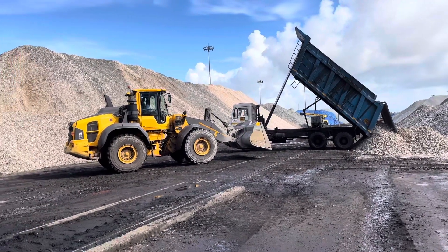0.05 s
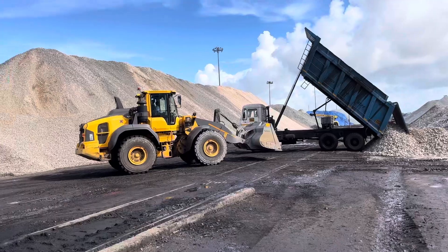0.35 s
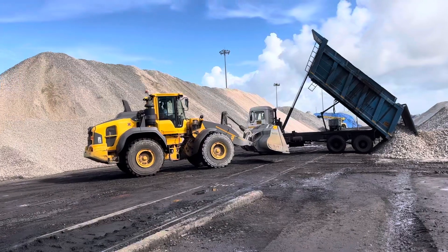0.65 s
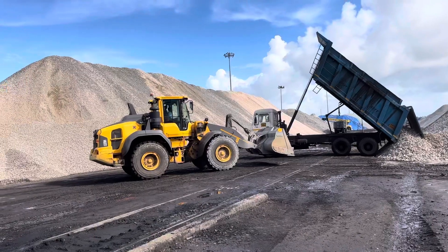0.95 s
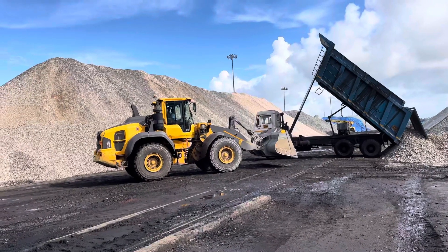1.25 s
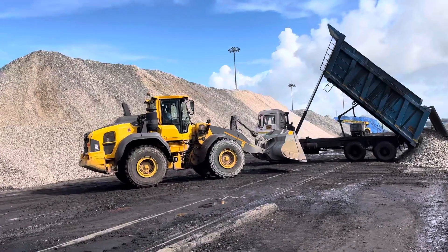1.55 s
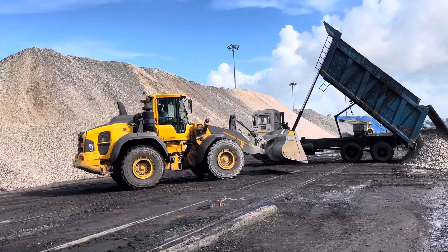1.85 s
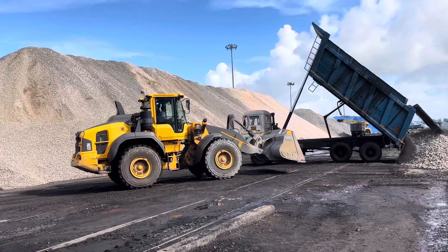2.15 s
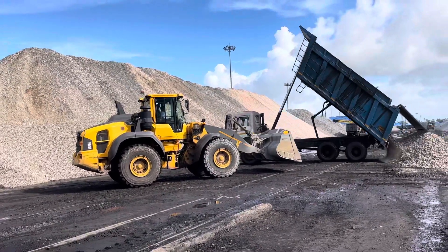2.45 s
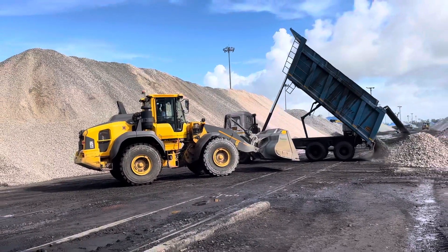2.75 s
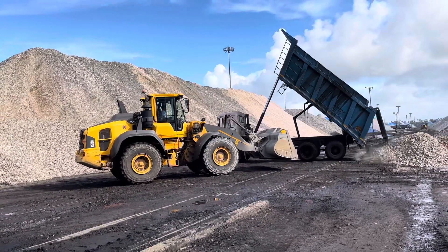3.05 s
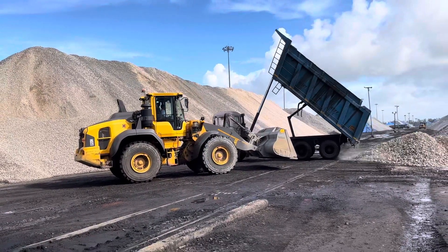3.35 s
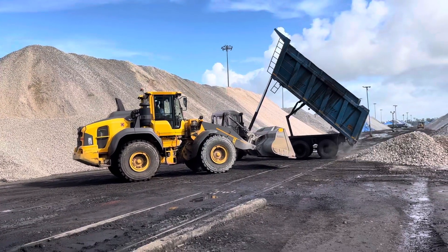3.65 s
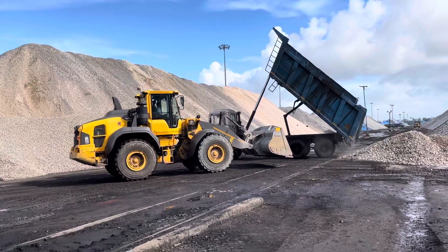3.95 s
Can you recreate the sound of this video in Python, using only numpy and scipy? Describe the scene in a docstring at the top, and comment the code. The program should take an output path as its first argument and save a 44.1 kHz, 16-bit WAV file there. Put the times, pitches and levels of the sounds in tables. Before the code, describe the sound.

Stones hiss down a tipping truck bed onto a heap outdoors, drumming and ringing on the steel while diesel engines rumble. A short hinge squeal leads to a loud tailgate bang and a hollow shudder.

```python
"""Tipper truck dumping gravel.

Diesel engines rumble in an open yard; one whines up as it gathers speed. The last stones hiss down
the raised steel bed onto the heap; the bed drums, hums and rings more brightly as it empties.
The tailgate squeals on its hinges and slams, and the hollow bed booms and shudders on."""
import sys
import numpy as np
from scipy import signal
from scipy.fft import rfft, irfft
from scipy.io import wavfile
from scipy.ndimage import uniform_filter1d

SR = 44100
rng = np.random.default_rng(int(sys.argv[2]) if len(sys.argv) > 2 else 0)


def unload_wav(signal):
    """Save mono or channel-first audio to the path in sys.argv[1] as 16-bit WAV at rate SR, clipped to [-1, 1]."""
    wavfile.write(
        sys.argv[1],
        SR,
        np.round(np.clip(np.atleast_2d(signal).T, -1, 1) * 32767).astype(np.int16),
    )


N = 176400
T = np.arange(N) / SR
HZ = np.maximum(np.arange(N // 2 + 1) * SR / N, 1)

ENGINE_LEVEL = [(0, -36.5), (1.2, -36), (1.7, -34), (2.6, -28.5), (2.9, -33.5), (4, -27.5)]  # exhaust rumble: time_s, level_db
ENGINE_SPECTRUM = [(22, -41), (52, -2.5), (95, -4), (140, -6.5), (200, -8.5), (350, -14), (480, -26),
                   (4000, -74)]  # freq_hz, gain_db
CASING_MODES = [(695, -5.5, 0.031), (815, -2.5, 0.033), (922, 0.5, 0.092), (1078, 0.5, 0.021),
                (1770, -5, 0.027)]  # engine casings: freq_hz, gain_db, t60_s
WHINE_GLIDE = [(.82, 668, -60), (.87, 676, -41), (1.02, 706, -40.5), (1.13, 738, -39), (1.42, 748, -36.5),
               (1.6, 768, -39), (1.85, 790, -52)]  # engine speeding up: time_s, pitch_hz, level_db

HUM_SWELLS = [(0.29, 0.16, -31.5), (0.436, 0.066, -29.5), (0.532, 0.093, -29), (.825, 0.093, -31.5),
              (.99, 0.27, -27.5), (1.218, .05, -27.5), (1.366, 0.14, -25.5), (1.68, 0.47, -28)]  # bed under the slipping load: centre_s, length_s, level_db
LUMP_KNOCKS = [(0.798, -21.5), (1.748, -18.5), (1.963, -20), (3.129, -17), (3.3, -23.5)]  # lumps on the bed: start_s, level_db
LUMP_MODES = [(94.6, -10.5, 0.23), (162.4, -5.5, 0.1), (256, 3, 0.095), (318, -3, 0.073)]  # knocked bed: freq_hz, gain_db, t60_s
STONE_PINGS = [(0.199, -19.5, 1280, 0.025), (.252, -20, 1240, 0.035), (0.425, -21, 1720, 0.035),
               (.709, -19, 4300, 0.013)]  # bouncing stones: start_s, level_db, pitch_hz, t60_s
SQUEAK_GLIDE = [(1.08, 4140, -80), (1.12, 4170, -42), (1.16, 4220, -33), (1.19, 4200, -80)]  # stone along steel: time_s, base_hz, level_db

SLIDE_LEVEL = [(0, -41.5), (.1, -37), (.75, -36), (1.15, -32.5), (1.55, -28.5), (1.95, -24.5),
               (2.35, -22.5), (2.85, -25), (2.95, -21.5), (2.98, -19), (3.05, -23), (3.2, -27.5),
               (3.38, -31.5), (3.6, -56), (3.75, -54)]  # gravel over steel: time_s, level_db
SLIDE_SPECTRUM = [(500, -18.5), (900, -1.5), (1500, 4), (1780, 5.5), (2030, -1), (2300, 3.5), (2750, 3),
                  (3300, 0.5), (4100, 0), (5000, -7.5), (5500, -13), (6500, -9.5), (7500, -16)]  # freq_hz, gain_db
SLIDE_TREBLE = [(10500, -18.5), (14000, -24)]  # freq_hz, gain_db
SPILL_SWELLS = [(.08, 0.058, -39), (.38, 0.046, -37.5), (.87, .07, -36.5), (1.96, 0.16, -32),
                (2.32, 0.092, -27.5)]  # fine stones skittering: centre_s, length_s, level_db
SPILL_SPECTRUM = [(900, -17), (2200, 6.5), (6500, -1.5), (13000, -17)]  # freq_hz, gain_db
FLOOR_LEVEL = [(0, -45), (1.5, -51.5), (2.1, -26), (2.6, -21.5), (2.9, -22), (2.99, -16.5), (3.06, -26),
               (3.2, -25.5), (3.35, -58)]  # bared floor ringing: time_s, level_db
STEEL_MODES = [(1257, -4, 0.082), (1594, -3.5, 0.083), (1707, -3, 0.06), (1795, -.5, 0.085),
               (2232, -7.5, 0.11), (2420, -7.5, 0.068), (2570, -9, 0.11), (3170, 0.5, 0.032),
               (3293, 0, 0.055), (3437, 3, 0.038), (6320, -20, 0.025)]  # freq_hz, gain_db, t60_s
HEAP_LEVEL = [(0, -42.5), (.7, -38.5), (1.0, -32.5), (1.35, -29), (1.9, -26), (2.5, -27), (2.9, -31),
              (3.4, -31), (4, -35)]  # gravel landing: time_s, level_db
HEAP_SPECTRUM = [(100, -24), (200, 4.5), (390, 6.5), (520, 0), (850, .5), (1200, -1), (3500, -61)]  # freq_hz, gain_db
PANEL_LEVEL = [(0, -46), (1.2, -36), (1.45, -28), (1.78, -24.5), (2.13, -29), (2.35, -22), (2.66, -39),
               (3.15, -36), (3.3, -37.5)]  # load drumming on the bed: time_s, level_db
PANEL_MODES = [(205.7, -4, 0.32), (246.2, -2, 0.18), (271.8, -4, 0.17), (320, -7, 0.12)]  # freq_hz, gain_db, t60_s

HINGE_GLIDE = [(2.9, 965, -70), (3.0, 940, -41), (3.07, 918, -35), (3.17, 905, -37), (3.3, 880, -48),
               (3.4, 880, -70)]  # hinge squeal: time_s, base_hz, level_db
HINGE_PARTIALS = [(0.999, 3.5), (2.55, 5)]  # ratio, gain_db
GATE_HITS = [(3.4316, -5, -14.5), (3.459, -22, -18.5), (3.499, -40, -17.5), (3.521, -52, -17)]  # slam, then three weaker rebounds: start_s, crack_db, boom_db
CRACK_SPECTRUM = [(300, -3), (1500, -10), (3600, 13.5), (5700, -8), (7100, 3), (14000, -12)]  # steel on steel: freq_hz, gain_db
BED_MODES = [(63.9, -10.5, 4.5), (86.3, -6, 1.1), (119.6, -6, 0.86), (163, -2.5, 1), (256, -17, 0.36),
             (309.6, -3, 0.29), (388, -6, 0.25)]  # hollow bed: freq_hz, gain_db, t60_s
THUD_MODES = [(84, -19, 0.26), (320, 2, 0.028)]  # first shove on the bed: freq_hz, level_db, t60_s
RATTLE_BANDS = [(35.7, 134, -21, 0.015, 1.24), (135, 380, -17, 0.023, 2.25), (427, 1430, -22, 0.043, 1.24),
                (1340, 3900, -19, 0.033, 0.44), (2460, 4600, -29, 0.0036, 1.35),
                (4900, 9000, -30, 0.0084, 0.57)]  # gate rattle: low_hz, high_hz, level_db, attack_s, t60_s
GRIT_BANDS = [(9000, 14000, -39, .012, .46)]  # grit off the gate: low_hz, high_hz, level_db, attack_s, t60_s
GATE_RING_MODES = [(921, -5, 0.3), (1195, 0, 0.3), (1295, -6, 0.25), (2360, -14, 0.06)]  # ringing gate: freq_hz, gain_db, t60_s
SHUDDER_LEVEL = [(3.5, -37), (3.75, -33), (3.87, -22), (3.94, -21.5), (4, -13.5)]  # bed shuddering: time_s, level_db
BED_SHUDDER_MODES = [(82.6, 1.5, 1.1), (106.2, -1, 0.36), (162.4, 0, 0.91), (253.4, -10.5, 0.24),
                     (339.4, -6.5, 0.16)]  # freq_hz, gain_db, t60_s

STEREO_PHASE = [(90, 0), (250, .25), (600, 1.4), (800, -.4), (1400, 2.0), (2250, 1.3), (2800, 3.0),
                (3250, 1.7), (3650, 2.4), (4800, 0), (7000, 1.4), (11000, .3)]  # freq_hz, right_lead_rad
STEREO_COHERENCE = [(200, .88), (700, .55), (1400, .8), (3300, .78), (5300, .3), (12000, .8)]  # freq_hz, coherence
STEREO_BALANCE = [(60, 1), (250, -2), (520, 0.5), (770, -6.5), (1350, 1.5), (1700, -2.5), (2500, -4.5),
                  (3050, -6.5), (3450, -3.5), (4400, -1.5), (6000, -0.5)]  # freq_hz, left_minus_right_db


def from_db(db):
    """Decibels to gain."""
    return 10 ** (np.asarray(db) / 20)


def rms_one(x):
    """Scale to unit rms."""
    return x / np.sqrt(np.mean(x ** 2) + 1e-20)


def level(rows):
    """Gain envelope from time_s, level_db rows."""
    return from_db(np.interp(T, *np.transpose(rows)))


def swells(rows):
    """Gain envelope, one cosine arch per row."""
    return sum(from_db(db) * np.cos(np.pi * np.clip((T - centre_s) / length_s, -.5, .5))
               for centre_s, length_s, db in rows)


def burst(start_s, attack_s, t60_s):
    """Linear rise, exponential fall."""
    rise = np.clip((T - start_s) / attack_s, 0, 1)
    return rise * from_db(-60 * np.maximum(T - start_s - attack_s, 0) / t60_s)


def at_hz(rows):
    """Interpolate a table over log frequency."""
    hz, value = np.transpose(rows)
    return np.interp(np.log(HZ), np.log(hz), value)


def coloured(x, spectrum):
    """Filter by a spectrum; unit rms."""
    return rms_one(irfft(rfft(x) * from_db(at_hz(spectrum)), N))


def drift(corner_hz):
    """Low-passed noise; unit rms."""
    return rms_one(irfft(rfft(rng.standard_normal(N)) / (1 + (HZ / corner_hz) ** 2), N))


def sine(hz, waver):
    """Unit-rms sine; waver is the relative pitch spread."""
    return np.sqrt(2) * np.sin(2 * np.pi * np.cumsum(hz * (1 + waver * drift(41.7))) / SR)


def tone(glide, partials, waver, flutter_db):
    """Gliding tone; each ratio, gain_db partial flutters independently."""
    time_s, hz, db = np.transpose(glide)
    base_hz = np.interp(T, time_s, hz)
    wave = sum(from_db(gain_db + flutter_db * drift(44)) * sine(ratio * base_hz, waver)
               for ratio, gain_db in partials)
    return from_db(np.interp(T, time_s, db)) * wave


def ring(x, hz, t60_s):
    """One mode: a unit click starts a decaying unit sine."""
    radius, angle = from_db(-60 / (t60_s * SR)), 2 * np.pi * hz / SR
    return signal.lfilter([0, np.sin(angle)], [1, -2 * radius * np.cos(angle), radius ** 2], x + 1e-18)


def clicks(times_s, db):
    """One impulse at each time."""
    out = np.zeros(N)
    np.add.at(out, np.clip((np.asarray(times_s) * SR).astype(int), 0, N - 1), from_db(db))
    return out


def contacts(per_s, spread_db):
    """Two independent showers of random impacts: direct, scattered."""
    sizes = from_db(spread_db * np.minimum(rng.exponential(1, (2, N)), 5))
    signs = rng.choice([-1, 1], (2, N))
    return rms_one(sizes * signs * (rng.random((2, N)) < per_s / SR))


def steady(x):
    """Hold the running rms near 1."""
    return x / np.sqrt(uniform_filter1d(x ** 2, 5000, axis=-1) + 1e-12)


def pelted(modes, per_s):
    """Modes kept ringing by a shower of contacts, shifted in time for each."""
    hits = contacts(per_s, spread_db=4)
    return steady(sum(from_db(db) * rms_one(ring(np.roll(hits, 997 * k, axis=-1), hz, t60_s))
                      for k, (hz, db, t60_s) in enumerate(modes)))


def casing_clatter(level_db=-39.5):
    """Engine casings ring under steady small impacts."""
    return from_db(level_db) * pelted(CASING_MODES, per_s=2000)


def engine_rumble(firing_hz=34.34, jitter_cycles=.04, spread_db=7.5, noise_db=2):
    """Uneven diesel firings in low exhaust noise."""
    timing, strength = rng.standard_normal((200, 2)).T
    times_s = (np.arange(len(timing)) + jitter_cycles * timing) / firing_hz
    inside = times_s < T[-1]
    firings = rms_one(clicks(times_s[inside], spread_db * strength[inside]))
    exhaust = from_db(noise_db) * rng.standard_normal((2, N))
    return level(ENGINE_LEVEL) * coloured(firings + exhaust, ENGINE_SPECTRUM)


def engine_whine():
    """A whine rises as an engine gathers speed."""
    return tone(WHINE_GLIDE, [(1, 0)], waver=.008, flutter_db=2.5)


def bed_hum(pitch_hz=249, flutter_db=2.2):
    """The bed hums in rough swells as the load slips."""
    return swells(HUM_SWELLS) * rms_one(from_db(flutter_db * drift(35)) * sine(pitch_hz, waver=.034))


def stone_squeak():
    """One stone rubs along the steel."""
    return tone(SQUEAK_GLIDE, [(.99, 0)], waver=.0034, flutter_db=2)


def loose_stones():
    """Lumps thud on the bed; single stones ping as they bounce clear."""
    hits = clicks(*np.transpose(LUMP_KNOCKS))
    thuds = sum((-1) ** k * from_db(db) * ring(hits, hz, t60_s)
                for k, (hz, db, t60_s) in enumerate(LUMP_MODES))
    pings = sum(ring(clicks([start_s], db), hz, t60_s) for start_s, db, hz, t60_s in STONE_PINGS)
    return thuds + pings


def gravel(flutter_db=.7):
    """Stones slide and spill down the bed, ring its floor, drum its panels and land on the heap."""
    flutter = from_db(flutter_db * drift(21))
    scrape = contacts(per_s=5000, spread_db=-.5)
    slide = level(SLIDE_LEVEL) * coloured(scrape, SLIDE_SPECTRUM + SLIDE_TREBLE)
    spills = swells(SPILL_SWELLS) * coloured(contacts(per_s=2100, spread_db=1), SPILL_SPECTRUM)
    floor = level(FLOOR_LEVEL) * pelted(STEEL_MODES, per_s=1500)
    heap = level(HEAP_LEVEL) * coloured(contacts(per_s=1800, spread_db=2.5), HEAP_SPECTRUM)
    panels = level(PANEL_LEVEL) * pelted(PANEL_MODES, per_s=600)
    return flutter * (slide + floor) + spills + heap + panels


def hinge_squeal():
    """The swinging tailgate rubs on its hinges."""
    return tone(HINGE_GLIDE, HINGE_PARTIALS, waver=.015, flutter_db=2)


def gate_slam(attack_s=.0012, crack_t60_s=.017, clang_db=-13.5, thud_delay_s=.00377):
    """Steel hits steel: each hit cracks, clangs and booms the bed; the first also thuds."""
    hits_s, crack_db, boom_db = np.transpose(GATE_HITS)
    envelope = sum(from_db(db) * burst(start_s, attack_s, crack_t60_s)
                   for start_s, db in zip(hits_s, crack_db))
    out = envelope * coloured(rng.standard_normal((2, N)), CRACK_SPECTRUM)
    boom = sum((-1) ** k * ring(clicks(hits_s, boom_db + db + rng.normal(0, 1, len(hits_s))), hz, t60_s)
               for k, (hz, db, t60_s) in enumerate(BED_MODES))
    clang = sum(ring(clicks(hits_s + attack_s, crack_db + clang_db + db), hz, t60_s)
                for hz, db, t60_s in STEEL_MODES)
    thud = sum(ring(clicks(hits_s[:1] + thud_delay_s, db), hz, t60_s) for hz, db, t60_s in THUD_MODES)
    out[0] += boom + clang + thud  # direct only
    return out


def gate_rattle(start_s=3.421, ring_db=-25.5):
    """The slammed gate rattles, sprays grit and rings."""
    rattle = np.zeros((2, N))
    for low_hz, high_hz, db, attack_s, t60_s in RATTLE_BANDS + GRIT_BANDS:
        bandpass = signal.butter(3, [low_hz, high_hz], "band", fs=SR, output="sos")
        band = signal.sosfilt(bandpass, contacts(per_s=5400, spread_db=3))
        rattle += from_db(db) * steady(band) * burst(start_s, attack_s, t60_s)
    ring_gain = from_db(ring_db) * burst(start_s, attack_s=.065, t60_s=1.25)
    return rattle + ring_gain * pelted(GATE_RING_MODES, per_s=1100)


def bed_shudder():
    """Low modes of the bed build after the gate's first hit."""
    return level(SHUDDER_LEVEL) * (T > GATE_HITS[0][0]) * pelted(BED_SHUDDER_MODES, per_s=800)


def stereo(direct, scattered):
    """Direct sound as mid, yard scatter as side; phase and level differ between left and right."""
    coherence = np.clip(at_hz(STEREO_COHERENCE), 0, .99)
    mid = rfft(direct) * np.sqrt((1 + coherence) / 2)
    side = rfft(scattered) * np.sqrt((1 - coherence) / 2)
    pan = np.exp(-.5j * at_hz(STEREO_PHASE)) * from_db(at_hz(STEREO_BALANCE) / 2)
    return irfft(np.array([(mid + side) * pan, (mid - side) / pan]), N)


def scene():
    """Engines, load and tailgate across the yard."""
    unloading = casing_clatter() + gravel() + engine_rumble()
    direct, scattered = unloading + gate_slam() + gate_rattle() + bed_shudder()
    direct += engine_whine() + hinge_squeal() + stone_squeak() + bed_hum() + loose_stones()
    return stereo(direct, scattered)


def record(dry):
    """Narrow treble notch, soft clipping, steep low-pass."""
    notch_hz, width_hz, depth_db = 8423, 570, -31.5
    ceiling, cutoff_hz = 1.2, 14300
    notch = from_db(depth_db * np.exp(-((HZ - notch_hz) / width_hz) ** 2))
    notched = irfft(rfft(dry) * notch, N)
    lowpass = signal.ellip(10, .2, 80, cutoff_hz, fs=SR, output="sos")
    return signal.sosfilt(lowpass, ceiling * np.tanh(notched / ceiling))


dry = scene()
out = record(dry)
unload_wav(out)
```